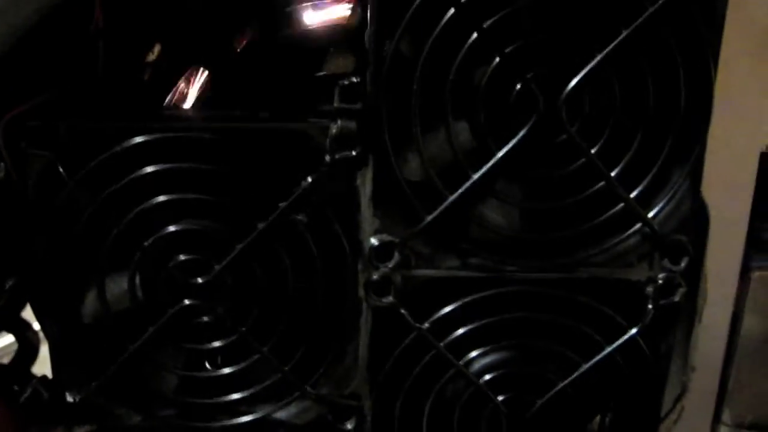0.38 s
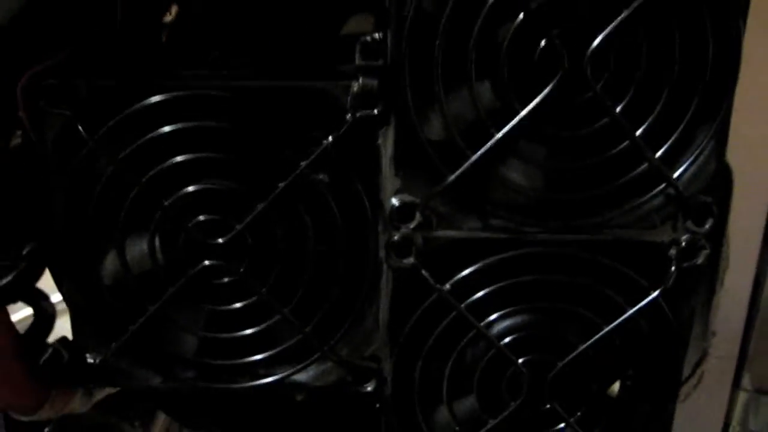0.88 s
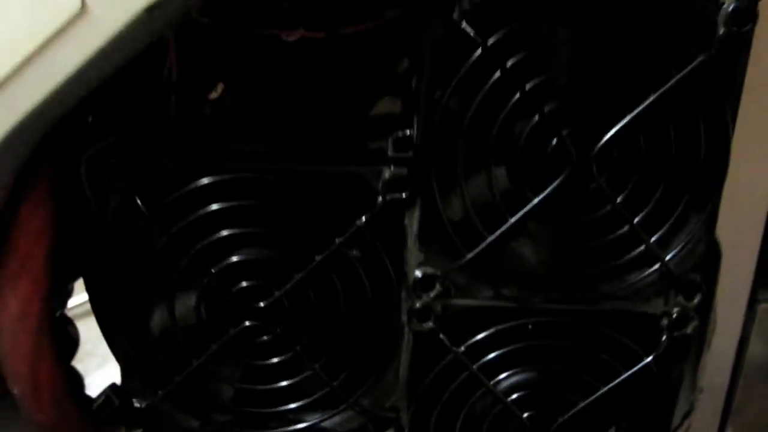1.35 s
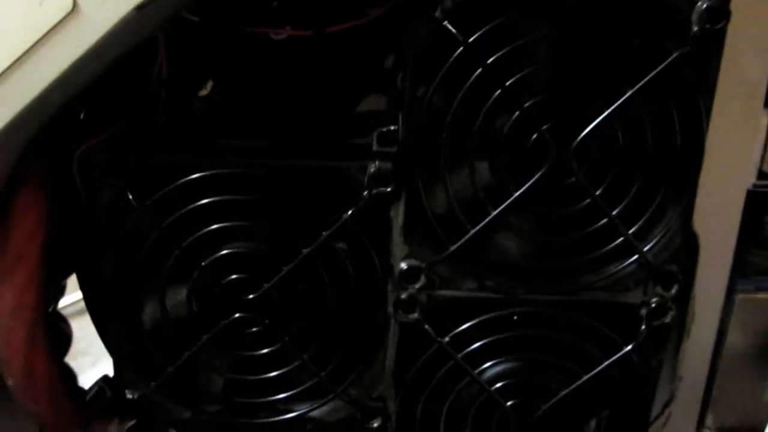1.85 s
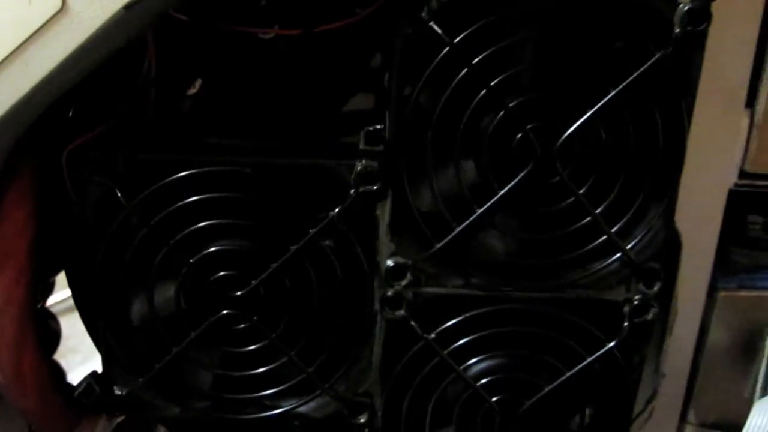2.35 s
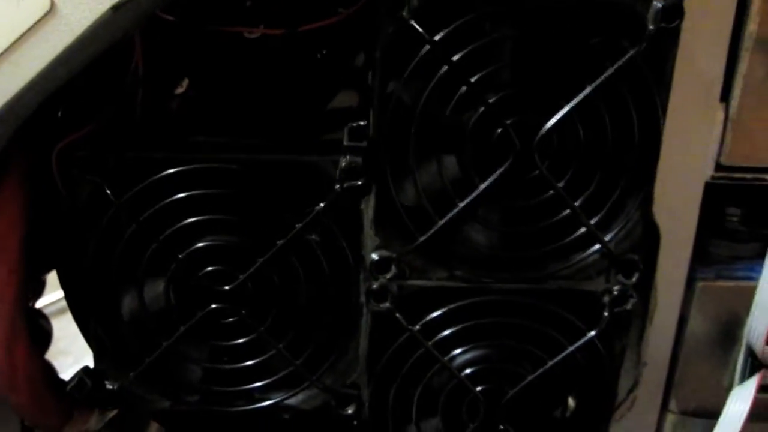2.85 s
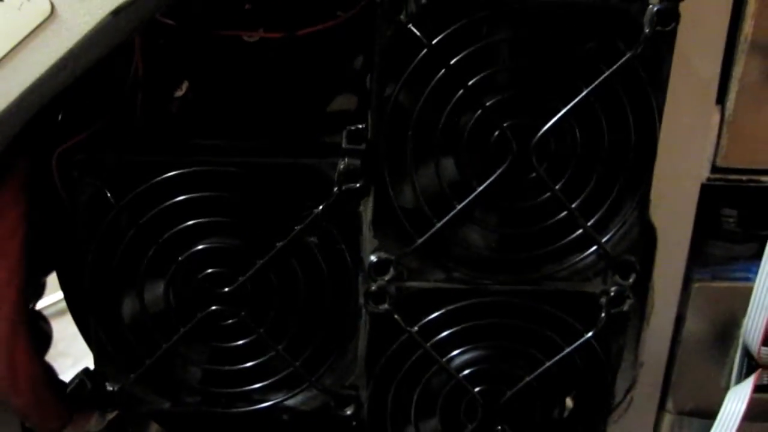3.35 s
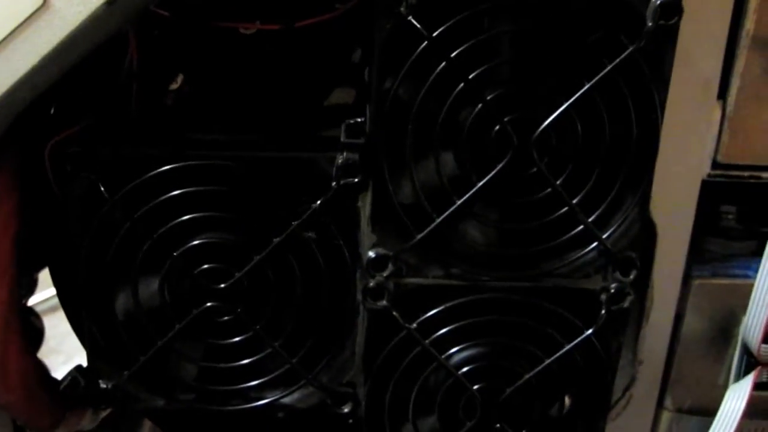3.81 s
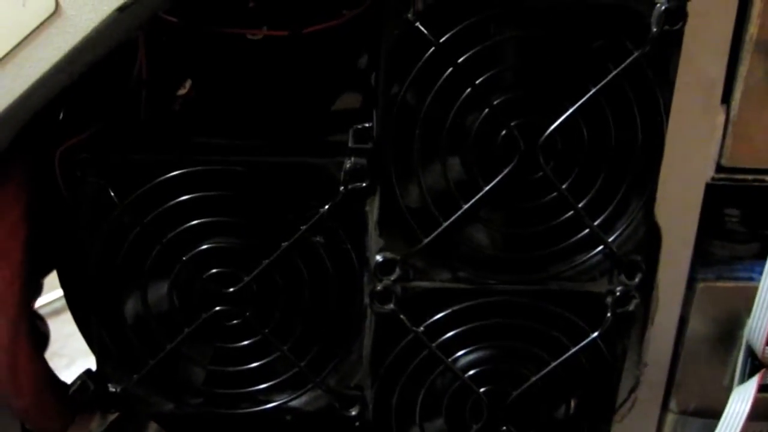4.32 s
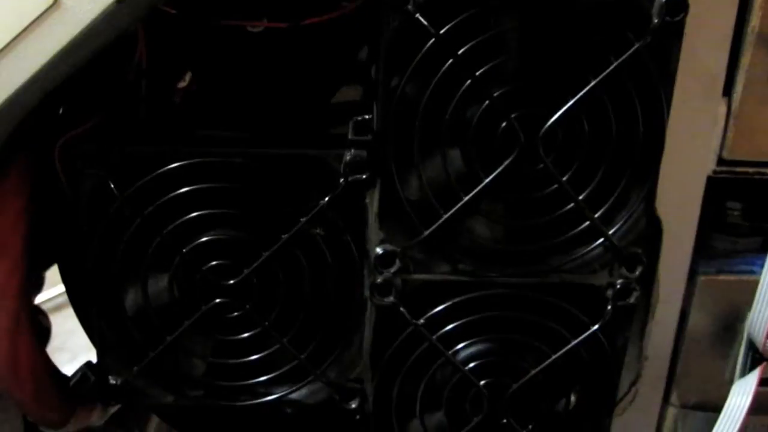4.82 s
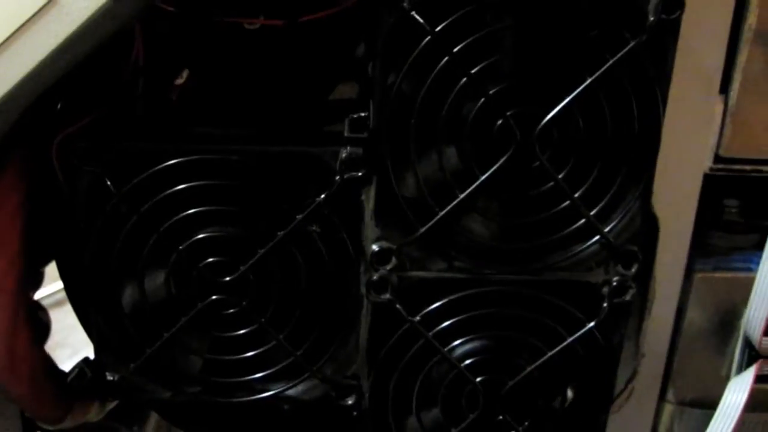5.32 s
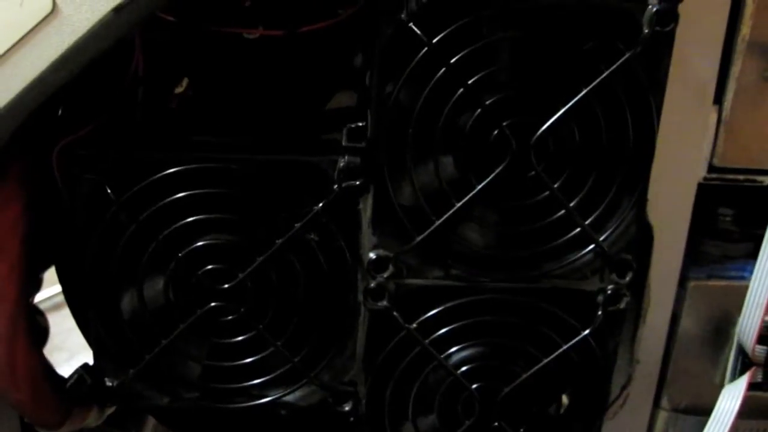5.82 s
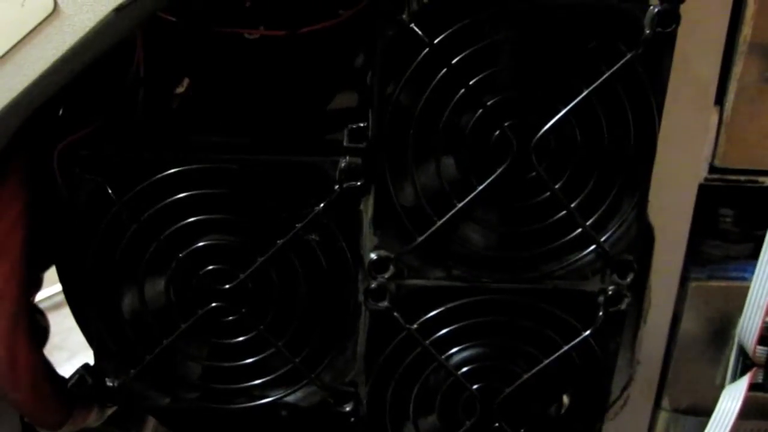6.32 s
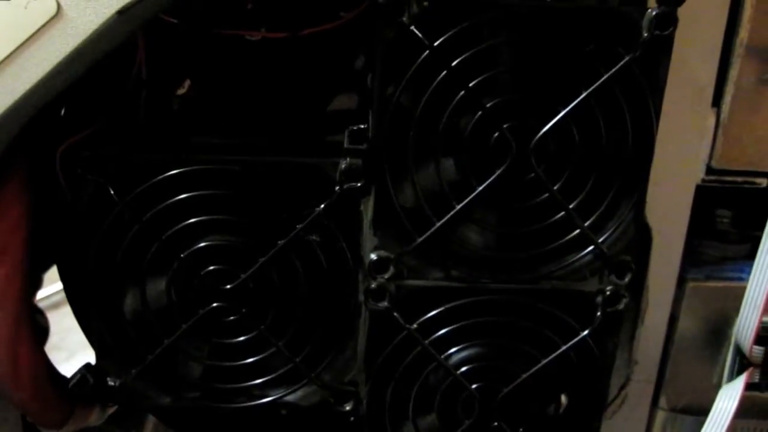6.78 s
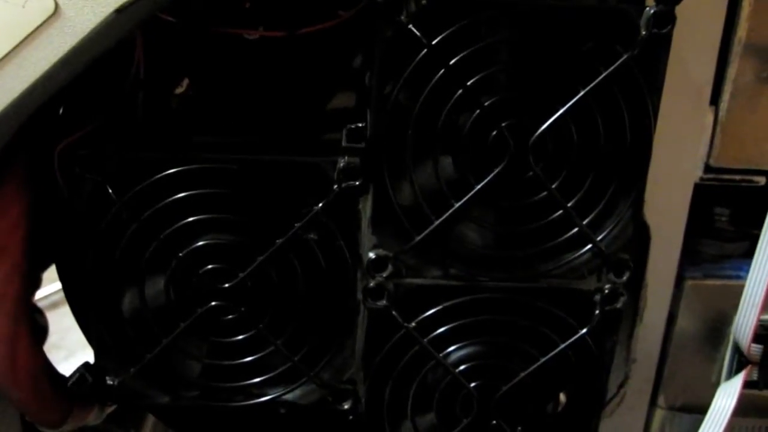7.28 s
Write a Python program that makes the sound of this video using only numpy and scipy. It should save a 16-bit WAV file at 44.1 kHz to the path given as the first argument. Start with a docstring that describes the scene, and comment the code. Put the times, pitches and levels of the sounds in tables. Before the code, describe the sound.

A brushed electric motor chirps, jolts and spins up into a harsh hissing whine, revving three times, coasting down, then slowly climbing again.

```python
"""A large brushed electric motor runs without load in a garage while the throttle is opened and closed.
Its brushes scrape over the same rough commutator on every turn, so the hiss is a dense comb of tones at
multiples of the turning rate, gliding with speed. Bar and slot tones stand out above it. At the start the
brushes squeal, the frame is jolted and the brushes bounce; later come sparks, stirred air and a faint
garage noise. Gain control softens the loud parts."""
import sys
import numpy as np
from scipy import signal
from scipy.fft import rfft, irfft, next_fast_len
from scipy.io import wavfile
from scipy.ndimage import uniform_filter1d

SR = 44100
rng = np.random.default_rng(int(sys.argv[2]) if len(sys.argv) > 2 else 0)


def transcribe(u):
    """Save the signal u as a 16-bit wav file named by the first command-line argument.

    u: samples, shape (n,) or (channels, n), limited to [-1, 1]; the rate is SR.
    q: integer samples, one column per channel.
    """
    v = np.clip(np.atleast_2d(u).T, -1, 1)
    q = np.round(v * 32767).astype(np.int16)
    wavfile.write(sys.argv[1], SR, q)


def attenuation_scalar(level_db):
    """Turn a level in dB into a linear amplitude multiplier (20 dB per decade)."""
    decades = np.asarray(level_db, float) / 20
    return 10 ** decades


N = 337806  # length [samples]

# steady garage noise, shape only: (frequency [Hz], relative density [dB])
GARAGE_COLOUR = [(18, -25), (30, -15), (219, -1), (256, 1.5), (292, -8), (639, -4), (897, -11), (1170, -10),
                 (15500, -27.5)]
# air stirred by the rotor, shape only: (frequency [Hz], relative density [dB])
AIR_COLOUR = [(15, -48), (30, -32), (120, -20.5), (320, -5.5), (500, 2.5), (690, -4), (900, 6), (1500, 0.5),
              (2000, -10)]
# sparks at the brushes: (time [s], peak level of the noise before its filter [dB])
SPARK_BURSTS = [(.36, -24), (.39, -19), (2.81, -20)]
# broad colour of casing and microphone: (frequency [Hz], gain [dB])
CASING_COLOUR = [(60, -60.5), (200, -51.5), (350, -20.5), (700, -14), (1200, -11), (1950, -13.5),
                 (2300, -13.5), (3200, -7), (5000, -7.5), (7000, -6), (7800, -7), (12500, -10),
                 (14000, -16), (15800, -24)]
# casing resonances: (frequency [Hz], width [Hz], gain [dB])
CASING_RESONANCES = [(506, 25, 8), (900, 45, 9.5), (1470, 44, 4.5), (2186, 190, 5.5), (3820, 130, 2.5),
                     (4180, 340, 4), (4696, 124, 2.5), (5300, 255, 5), (6435, 600, 5), (7365, 89, 6.5),
                     (9330, 190, 4.5), (10300, 1000, -1)]
# twitches before the rotor breaks free: (time [s], peak level [dB], 60 dB rise [s], 60 dB fall [s])
ROTOR_TWITCHES = [(.232, -36.5, .025, .05), (0.275, -35, .004, 0.12), (0.295, -21, 0.0093, 0.051)]
# brush squeal before the rotor breaks free: (time [s], level [dB], share of alternating slips [0-1])
SQUEAL_COURSE = [(.08, -68, 0), (.108, -50, 0), (.15, -45.5, 0), (.19, -29.5, 0.05), (.212, -37, 0),
                 (.23, -31.5, 0.34), (.245, -44, 0.6), (.27, -45, 0.3), (.295, -36, 0.1)]
# squeal harmonics, from the first upwards: (relative level [dB])
SQUEAL_HARMONICS = [-2.5, -6, -7, -7, -13.5, -15, -15, -23, -22, -33]
# throttle, as the speed that the supply pulls towards: (time [s], speed [turns per s])
THROTTLE_COURSE = [(.254, .2), (.37, 46.91), (.448, 65.32), (.73, 70.34), (.991, 58.6), (1.541, 44.97),
                   (1.573, 60.87), (1.649, 68.93), (1.91, 41.5), (2.75, 35.15), (2.774, 42.67),
                   (2.861, 66.46), (3.096, 70.32), (3.14, 30), (4.205, 42.25), (4.681, 34.43),
                   (4.931, 32.31), (5.235, 32.46), (5.294, 36.05), (5.739, 37.2), (6.174, 39.27),
                   (6.235, 39.96), (6.472, 41.96), (6.791, 43.47), (7.116, 46.32), (7.263, 50.61),
                   (7.676, 51.28)]
# contact strength of the brushes: (time [s], level [dB])
BRUSH_CONTACT = [(.262, -58.5), (.272, -16), (.29, -25), (.298, -3.5), (.33, -1), (.5, 4.5), (1.55, 3.5),
                 (7.66, 2.5)]
# slots, bars and high spots heard as separate tones: (passes [per turn])
TONES_PER_TURN = (8, 12, 23, 55, 70, 81, 82, 92, 154, 162, 185, 243)
# one row per tone, before contact and torque; the casing modes are those it drives hard:
# (plain level [dB rms], modes: (frequency [Hz], width [Hz], level [dB rms]))
TONE_CASING_MODES = [(-68, [(385, 20, -53.5), (469, 50, -46.5)]), (-61, [(431, 32, -54), (590, 82, -48.5),
                     (813, 140, -47.5)]), (-51, [(893, 69, -33.5), (1076, 40, -45.5), (730, 36, -51),
                     (1535, 80, -43)]), (-77, [(2330, 470, -41), (3112, 160, -36.5), (3820, 91, -30.5)]),
                     (-45.5, [(2780, 73, -44), (3730, 320, -34.5), (4190, 180, -32.5), (4780, 110, -35)]),
                     (-42.5, [(476, 150, -15), (920, 150, -13.5), (1490, 160, -23.5), (2160, 180, -28),
                     (2790, 240, -29.5), (3130, 140, -29.5), (3430, 290, -32.5), (3780, 340, -33.5),
                     (4150, 93, -30), (4590, 210, -33.5), (4860, 50, -33), (5100, 190, -31),
                     (5500, 100, -42)]), (-44, [(3330, 600, -37.5), (4126, 450, -36.5), (4680, 65, -32),
                     (5330, 400, -37)]), (-50.5, [(3340, 180, -49), (4560, 120, -33), (4960, 150, -42),
                     (6129, 150, -42)]), (-57, [(4851, 280, -37), (6000, 200, -28), (7459, 120, -32),
                     (9170, 300, -38)]), (-46.5, [(5020, 130, -32), (5660, 450, -34), (6600, 200, -33),
                     (7640, 130, -37), (8360, 500, -41), (9000, 250, -38), (10160, 300, -42)]),
                     (-54, [(6800, 220, -33), (7300, 470, -41), (9350, 170, -38), (10400, 500, -45)]),
                     (-60, [(8650, 610, -38), (12379, 800, -44), (14207, 400, -51)])]
# roughness of the commutator surface: (bumps [per turn], relative height [dB])
COMMUTATOR_ROUGHNESS = [(3, 18.5), (8, -10), (20, -5), (40, 1), (80, 1.5), (120, 1), (200, 0.5),
                        (320, -1.5), (500, -5)]
# bumps that stand out of the roughness or sink below it: (bumps [per turn], height above neighbours [dB])
PROUD_BUMPS = [(9, 3), (14, -4), (15, -5), (22, 1), (24, -4), (28, -5), (29, -6), (31, 1), (32, 4), (35, 2),
               (38, 3), (41, 3), (50, 3), (80, -4), (83, -3), (113, 2), (127, 3), (135, 3), (151, 2),
               (161, 3), (163, 4), (242, 3), (256, 3)]


def in_time(rows):
    """Read the columns of a timed table at every sample."""
    s, *columns = np.transpose(rows)
    return [np.interp(np.arange(N) / SR, s, column) for column in columns]


def along(points, where):
    """Read a two-column table along a logarithmic axis."""
    at, db = np.transpose(points)
    return np.interp(np.log(np.maximum(where, 1)), np.log(at), db)


def rms_one(x):
    """Scale a sound to unit power."""
    return x / np.sqrt(np.mean(x ** 2))


def wander(rate):
    """Slow random curve: straight lines between random points of spread 1, two points per cycle of rate [Hz]."""
    knots = np.arange(0, N / SR + 1, .5 / rate)
    return np.interp(np.arange(N) / SR, knots, rng.standard_normal(len(knots)))


def hiss(colour):
    """Steady noise of a given colour, at unit power."""
    hz = np.fft.rfftfreq(N, 1 / SR)
    white = rfft(rng.standard_normal(N))
    return rms_one(irfft(white * attenuation_scalar(along(colour, hz)), N))


def garage():
    """The garage gives a faint, steady background noise."""
    return attenuation_scalar(-55) * hiss(GARAGE_COLOUR)


def echoes(x, direct_db, level_db, t60):
    """Walls return a dying wash that blurs gliding tones."""
    t = np.arange(SR // 2) / SR
    wash = rng.standard_normal(len(t)) * attenuation_scalar(-60 * t / t60) * (t > .006)
    returned = signal.fftconvolve(x, wash / np.linalg.norm(wash))[:N]
    return attenuation_scalar(direct_db) * x + attenuation_scalar(level_db) * returned


def air(speed):
    """The rotor's fan roars low, louder with speed."""
    level_db = -36.5 + 22.6 * np.log10(speed / 50 + 1e-6)  # first number: level at 50 turns per s
    dull = signal.butter(2, 3000, fs=SR, output="sos")
    return attenuation_scalar(level_db) * signal.sosfilt(dull, hiss(AIR_COLOUR))


def sparks():
    """Sparks are short bursts of bright noise that swell and fade around set times."""
    t, envelope = np.arange(N) / SR, 0
    for s, db in SPARK_BURSTS:
        sixty_db_s = np.where(t < s, .025, .06)  # rise, then fall
        envelope = envelope + attenuation_scalar(db - 60 * np.abs(t - s) / sixty_db_s)
    bright = signal.butter(2, [8000, 14000], "band", fs=SR, output="sos")
    return envelope * signal.sosfilt(bright, rng.standard_normal(N))


def casing(hz):
    """The casing shapes sound by a broad colour and a peak or dip for each resonance."""
    gain = attenuation_scalar(along(CASING_COLOUR, hz)) * (1 + 0j)
    for centre_hz, width_hz, db in CASING_RESONANCES:
        gain = gain * (1 + (attenuation_scalar(db) - 1) / (1 + 2j * (hz - centre_hz) / width_hz))
    return gain


KICK_S = .299  # moment of the torque step [s]


def kick():
    """The torque step jolts the frame: a short noise burst rings the first three casing resonances."""
    t = np.maximum(np.arange(N) / SR - KICK_S, 0)
    burst = rng.standard_normal(N) * np.minimum(t / 0.0023, 1) * attenuation_scalar(-22 - 60 * t / 0.13)
    out = 0
    for hz, width_hz, db in CASING_RESONANCES[:3]:
        r = np.exp(-np.pi * 1.6 * width_hz / SR)  # rings 1.6 times as wide as in the table
        resonator = [1, -2 * r * np.cos(2 * np.pi * hz / SR), r * r]
        out = out + attenuation_scalar(db + 13.5) * signal.lfilter([1 - r, 0, r - 1], resonator, burst + 1e-18)
    return out


def chatter(pull):
    """Brushes bounce under torque and as the rotor twitches, hissing through the casing without repeating."""
    t = np.arange(N) / SR
    # -24 dB at a pull of 300 turns per s per s, growing 17 dB per tenfold pull
    bouncing = attenuation_scalar(-24 + 17 * np.log10(pull / 300 + 1e-9))
    coasting = attenuation_scalar(-45)
    level = (bouncing + coasting) * (t > KICK_S)
    for s, db, rise_s, fall_s in ROTOR_TWITCHES:
        level = level + attenuation_scalar(db - 60 * np.abs(t - s) / np.where(t < s, rise_s, fall_s))
    white = rfft(rng.standard_normal(N))
    return level * rms_one(irfft(white * casing(np.fft.rfftfreq(N, 1 / SR)), N))


def squeal():
    """Stick and slip gives a harmonic stack; strong and weak slips in turn add half lines."""
    db, alternate = in_time(SQUEAL_COURSE)
    # the pitch sags as the loudest level so far rises, and never recovers
    gripped_db = uniform_filter1d(np.maximum.accumulate(db), size=900)
    faint_hz, sag_hz_per_tenfold = 1414, 35.4
    hz = faint_hz - sag_hz_per_tenfold * np.maximum(gripped_db + 50.5, 0) / 20
    angle = 2 * np.pi * np.cumsum(hz) / SR
    flutter_db = 4
    stack = 0
    for k, level_db in enumerate(SQUEAL_HARMONICS, start=1):
        stack = stack + attenuation_scalar(level_db + flutter_db * wander(15.8)) * np.sin(k * angle + k * k)
    t = np.arange(N) / SR
    sounding = (t > SQUEAL_COURSE[0][0]) & (t < SQUEAL_COURSE[-1][0])
    return sounding * attenuation_scalar(db) * stack * (1 + alternate * np.sin(angle / 2))


def rotor():
    """The supply pulls the shaft up towards the throttle but cannot brake it; friction and drag slow it."""
    lag_s = .0424
    friction, drag = 13.76, .1674  # [turns per s per s], [share of speed lost per s]
    step = 88  # samples per step of the motion
    wanted, turns, rows = in_time(THROTTLE_COURSE)[0][::step], 0, []
    for want in wanted:
        pull = max(want - turns, 0) / lag_s
        turns = max(turns + (pull - friction - drag * turns) * step / SR, 0)
        rows.append((turns, pull))
    at = np.arange(N) / step
    return [np.interp(at, np.arange(len(rows)), column) for column in np.transpose(rows)]


def tones(speed):
    """Slots, bars and high spots pass a fixed number of times a turn; each swells as it glides through a mode."""
    angle, out = 2 * np.pi * np.cumsum(speed) / SR, 0
    coarse = np.arange(0, N, 64)  # levels are worked out every 64 samples
    for k, (plain_db, modes) in zip(TONES_PER_TURN, TONE_CASING_MODES):
        hz = k * speed[coarse]
        power = attenuation_scalar(2 * plain_db)
        for mode_hz, width_hz, db in modes:
            power = power + attenuation_scalar(2 * db) / (1 + (2 * (hz - mode_hz) / width_hz) ** 2) ** 2
        heard = np.sqrt(2 * power) * (hz < 15800)
        out = out + np.interp(np.arange(N), coarse, heard) * np.sin(k * angle + k)
    return out


def scrape(speed, contact, ring_s, uneven_db, oval_db, garage_db, garage_t60, count):
    """Each brush reads its own track of the commutator, alike on every turn, and rings a path of its own."""
    order, steps, size = np.arange(511), 2 ** 15, next_fast_len(N + SR // 2)  # order = bumps per turn
    height_db = along(COMMUTATOR_ROUGHNESS, order) + uneven_db * rng.standard_normal(len(order))
    for k, db in PROUD_BUMPS:
        height_db[k] += db
    height = attenuation_scalar(height_db) * ~np.isin(order, (0, *TONES_PER_TURN))  # tones() plays the left-out ones

    twice = np.arange(2 * N) / 2  # double rate keeps fast high orders from folding down
    angle = np.cumsum(np.interp(twice, np.arange(N), speed)) / (2 * SR) % 1  # in turns
    pressing = np.interp(twice, np.arange(N), contact)
    out_of_round = irfft(np.exp(2j * np.pi * rng.random(13)) * (order[:13] > 0), steps)
    bearing = attenuation_scalar(oval_db * rms_one(out_of_round))  # some parts of the turn bear harder

    t, total = np.arange(SR // 2) / SR, 0
    for brush in range(count):
        track = bearing * irfft(height * np.exp(2j * np.pi * rng.random(len(order))), steps)
        rub = pressing * np.interp(angle * steps, np.arange(steps), track)
        path = rng.standard_normal(len(t)) * attenuation_scalar(-60 * t / ring_s)
        walls = rng.standard_normal(len(t)) * attenuation_scalar(garage_db - 60 * t / garage_t60)
        walls = signal.lfilter([.35], [1, -.65], walls)  # walls swallow the treble
        # keeping the lower half of the spectrum returns to the normal rate
        total = total + rfft(rub, 2 * size)[:size // 2 + 1] * rfft(path + walls, size)
    return rms_one(irfft(total * casing(np.fft.rfftfreq(size, 1 / SR)), size)[:N])


def scene():
    """Motor and room, heard through one microphone and sent alike to both channels."""
    speed, pull = rotor()
    contact_db, = in_time(BRUSH_CONTACT)
    contact = attenuation_scalar(contact_db) * (contact_db > BRUSH_CONTACT[0][1])  # silent until the first rise
    pressing = contact * attenuation_scalar(0.49 * wander(8))  # brush springs never press quite evenly
    brushes = scrape(speed, pressing, ring_s=.025, uneven_db=1.5, oval_db=.9,
                     garage_db=-14, garage_t60=.35, count=10)
    torque_db = 6 * np.minimum(pull / 300, 1)  # tones grow with torque, up to 300 turns per s per s
    whine = echoes(contact * attenuation_scalar(torque_db) * tones(speed), direct_db=-2, level_db=-9, t60=.35)
    motor = attenuation_scalar(-20.5) * brushes + whine + air(speed)
    start = squeal() + kick() + chatter(pull)
    return np.tile(motor + start + sparks() + garage(), (2, 1))


def band_limit(x):
    """A steep low-pass at the top of the band."""
    return signal.sosfilt(signal.butter(12, 15870, fs=SR, output="sos"), x)


def record(dry):
    """Gain control takes off 0.7 dB per dB above its set level, within hundredths of a second; the top is cut."""
    r = np.exp(-1 / (.06 * SR))  # level is averaged over about 0.06 s
    level_db = 10 * np.log10(signal.lfilter([1 - r], [1, -r], dry[0] ** 2) + 1e-12)
    held = dry * attenuation_scalar(-.7 * np.maximum(level_db + 21.5, 0))
    top = signal.ellip(12, .3, 85, 15650, fs=SR, output="sos")
    return band_limit(signal.sosfilt(top, held))


dry = scene()
out = record(dry)
transcribe(out)
```